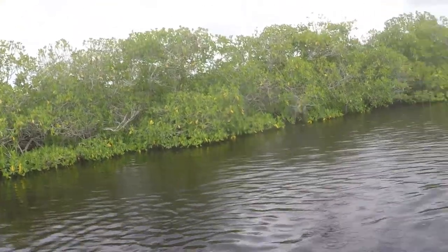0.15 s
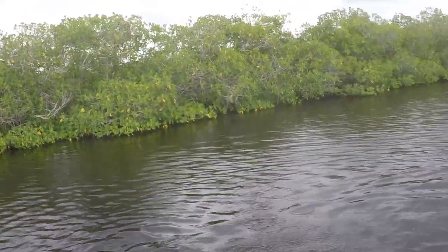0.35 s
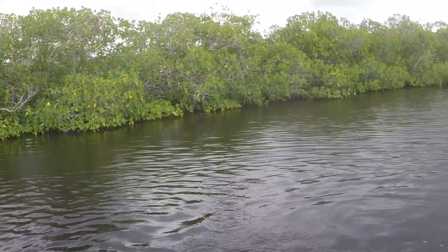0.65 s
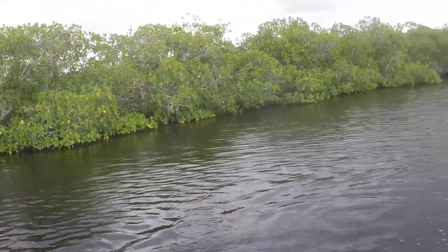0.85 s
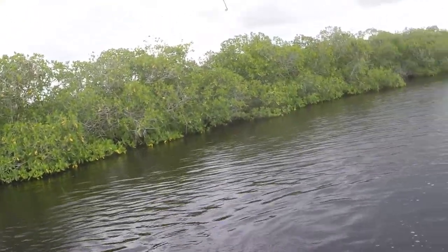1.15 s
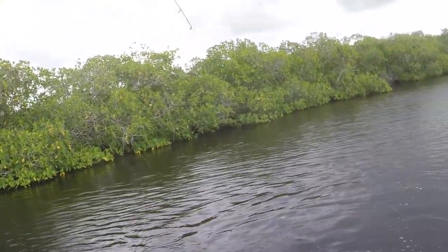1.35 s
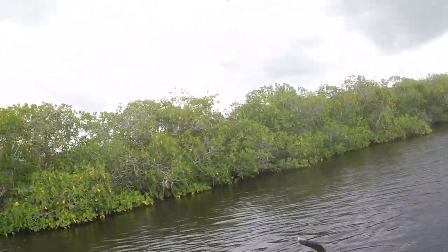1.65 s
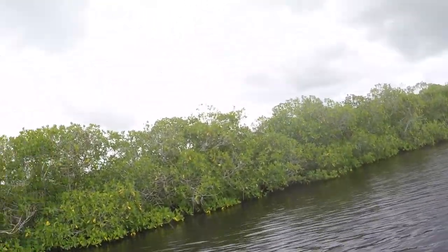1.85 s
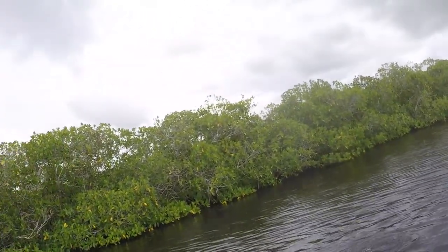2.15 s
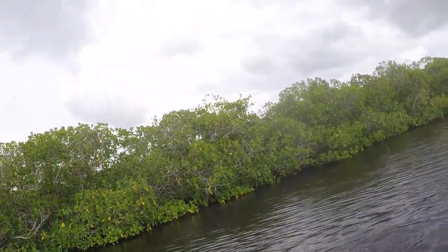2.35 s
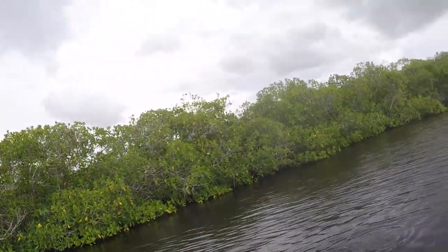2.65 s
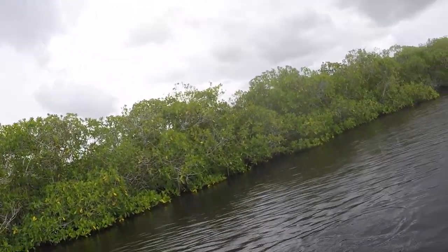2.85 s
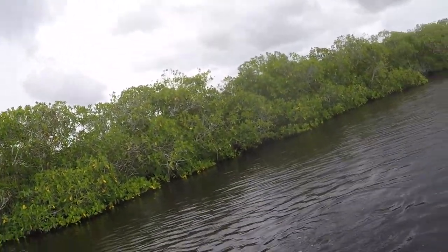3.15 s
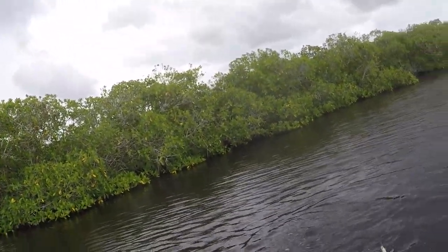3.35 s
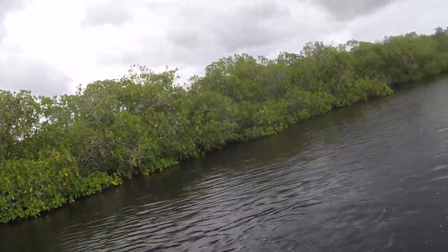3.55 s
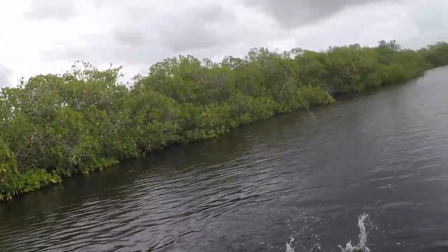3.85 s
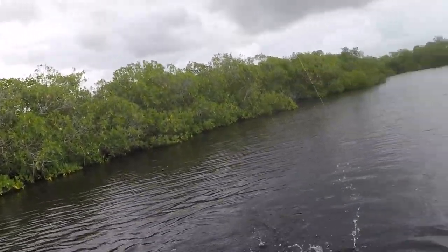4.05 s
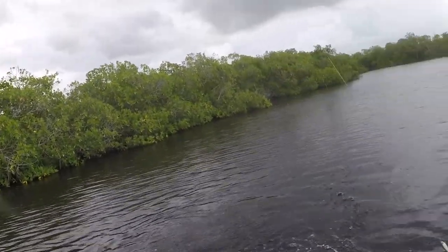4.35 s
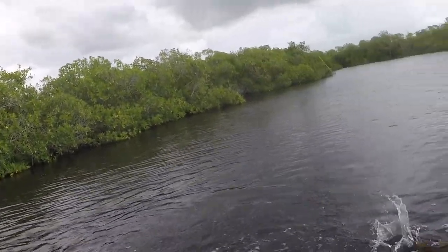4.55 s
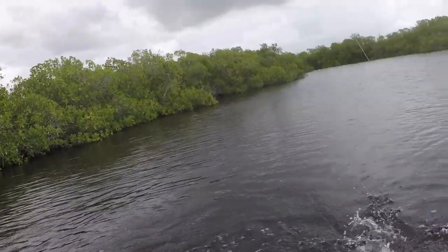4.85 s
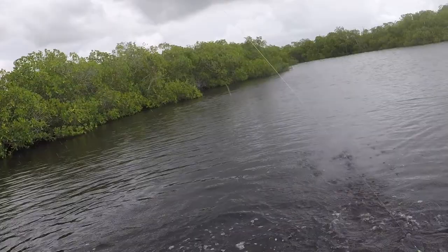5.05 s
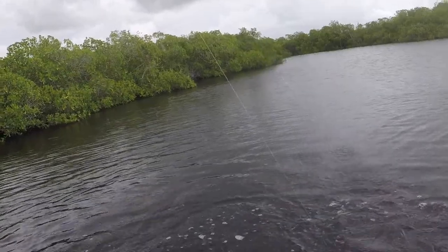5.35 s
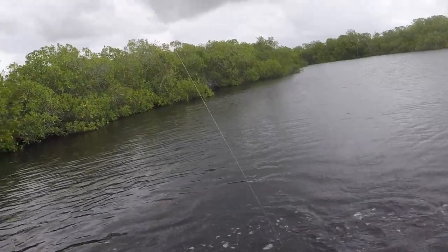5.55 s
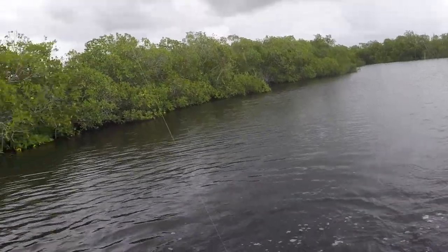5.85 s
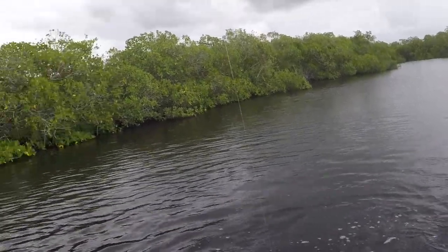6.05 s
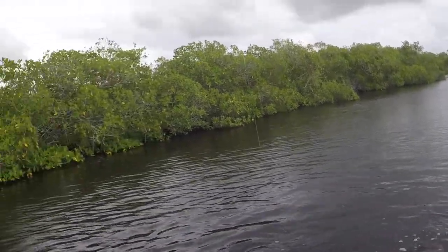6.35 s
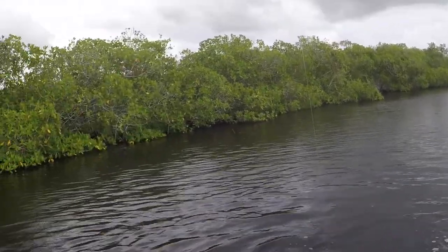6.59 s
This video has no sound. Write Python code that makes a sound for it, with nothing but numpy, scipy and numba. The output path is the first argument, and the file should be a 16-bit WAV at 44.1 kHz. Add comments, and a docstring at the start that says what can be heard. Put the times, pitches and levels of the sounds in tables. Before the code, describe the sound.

Fish thrashing and splashing beside a plastic boat hull, with plops, sharp knocks and ticks, while low wind gusts buffet the microphone increasingly hard.

```python
"""A low wind rumble, fizzing water and a few plops open the scene, then ticks on a hull and hard gusts crowd in.
A fish thrashes beside a plastic kayak on a windy creek, heard by a small two-port camera microphone.
Leaves and wash are coloured noise, wind is band noise with lone swept thuds, fizz is a crowd of decaying sines,
plops and drips are gliding sines, and ticks are ringing hull modes behind a blunt crack."""
import sys
import numpy as np
from scipy import signal
from scipy.fft import rfft, irfft
from scipy.io import wavfile
from scipy.ndimage import uniform_filter1d
from numba import njit

SR = 44100
rng = np.random.default_rng(int(sys.argv[2]) if len(sys.argv) > 2 else 0)


def wav_record(signal):
    """Record a signal, one row per channel, as 16-bit PCM in the file named by sys.argv[1]."""
    frames = np.transpose(np.atleast_2d(signal))
    bounded = np.clip(frames, -1, 1)
    # unit amplitude maps onto the largest positive 16-bit level
    quanta = np.round(bounded * 32767).astype(np.int16)
    wavfile.write(sys.argv[1], SR, quanta)


N = 296352
T = np.arange(N) / SR


def undb(db):
    """Turn decibels into a gain."""
    return 10 ** (np.asarray(db) / 20)


def unit(x):
    """Scale to rms 1."""
    return x / np.sqrt(np.mean(x ** 2))


def noise():
    """White noise as long as the scene."""
    return rng.standard_normal(N)


def colour(x, points):
    """Shape a sound by (Hz, dB) points joined on a log-frequency axis; rms 1."""
    hz, db = np.transpose(points)
    f = np.maximum(np.arange(N // 2 + 1) * SR / N, 1)
    shape_db = np.interp(np.log(f), np.log(hz), db, -90, -90)
    return unit(irfft(rfft(x) * undb(shape_db), N))


def band(x, lo_hz, hi_hz, order=2):
    """Keep one band of a sound; rms 1."""
    return unit(signal.sosfilt(signal.butter(order, [lo_hz, hi_hz], "band", fs=SR, output="sos"), x))


def walk(rate):
    """Random levels held 1 / rate s and slewed; rms 1."""
    hold = int(SR / rate)
    steps = np.repeat(rng.standard_normal(N // hold + 1), hold)
    return unit(uniform_filter1d(steps, hold)[:N])


def ports(x, alike):
    """The ports are wired in opposite sense and the left one hears late; diffuse sound is partly unalike."""
    lag_s = 0.00013
    left = alike * x[0] + np.sqrt(1 - alike ** 2) * x[1]
    return np.array([-np.interp(T - lag_s, T, left), x[0]])


def from_right(x):
    """Sound off the water on the right reaches the left port weak and late."""
    pan_db, lag_s = -8, 0.00059  # left minus right; delay of the left port
    late = np.interp(T - lag_s, T, x)
    return np.array([late, x]) * undb(np.array([[pan_db], [-pan_db]]) / 2)


def add(out, s, x, pan_db):
    """Place a short near sound: the left port in opposite sense, later the further right the source lies."""
    centre_lag_s, lag_per_db_s = 0.000035, -0.000018  # the louder the left port, the sooner it hears
    i, n = int(s * SR), np.arange(x.shape[1])
    lag = (centre_lag_s + lag_per_db_s * pan_db) * SR
    late = np.interp(n - lag, n, x[0], 0)
    placed = np.array([-late, x[1]]) * undb(np.array([[pan_db], [-pan_db]]) / 2)
    out[:, i:i + len(n)] += placed[:, :N - i]


@njit
def grains(rows, sr, n):
    """Decaying sines from rows (sample, Hz, cycles, size, glide); pitch grows by about exp(glide)."""
    y = np.zeros(n)
    for r in rows:
        phase, size, step = 0., r[3], 2 * np.pi * r[1] / sr
        length = int(3 * r[2] * sr / r[1])
        for i in range(int(r[0]), min(n, int(r[0]) + length)):
            y[i] += size * np.sin(phase)
            phase += step
            step *= 1 + r[4] / length
            size *= 1 - 5. / length
    return y


def fizz(rate, lo_hz, hi_hz, cycles, spread_db, glide):
    """Bubbles bursting, rate per second, at random times, pitches and sizes; rms 1."""
    when, pitch, rarity, length = rng.random((4, int(N / SR * rate)))
    hz = lo_hz * (hi_hz / lo_hz) ** pitch
    size = undb(-spread_db * np.log(rarity + .03))  # few large ones among many small
    rows = np.column_stack([when * N, hz, cycles * (.5 + length), size, np.full(len(when), glide)])
    return unit(grains(rows, 1. * SR, N))


def leaves():
    """Smooth distant hiss of foliage and ripples: coloured noise whose level drifts slowly."""
    # Tint of the foliage. Each row: frequency in Hz, relative density in dB per Hz.
    leaf_tint = [(150, -46), (250, 4.5), (872, -8.5), (1210, -12.5), (1900, -20), (2890, -25.5),
                 (4780, -42), (5880, -28), (9400, -23), (12600, -35.5), (15800, -38)]
    level_db = -47.5 + 1.0 * walk(3.0)
    return undb(level_db) * ports([colour(noise(), leaf_tint) for _ in range(2)], 0.87)


def puffs(eddies):
    """A lone eddy thuds for a few cycles, often harder on one port and out of step between them,
    and sheds small eddies."""
    # Single hard puffs. Each row: start in seconds, thud level in dB, nominal pitch in Hz,
    # small-eddy level in dB, left minus right in dB.
    puff_rows = [(0.76, -21, 150, -42, -6), (0.942, -24.5, 158, -37.5, -6), (1.056, -28, 136, -40.5, 3),
                 (1.386, -23.5, 186, -34.5, -13), (1.427, -26, 120, -38, -31),
                 (1.499, -16.5, 190, -30.5, -4), (1.544, -16.5, 183, -48, 4), (1.58, -17, 103, -26.5, -11),
                 (1.63, -17.5, 159, -25, -9.5), (1.708, -23, 88.8, -43, -2), (1.79, -22.5, 88, -36, -10),
                 (1.845, -20.5, 110, -39, -1), (1.911, -21.5, 91.5, -36, -13), (2.329, -18, 111, -26, 4),
                 (2.482, -22, 71, -29, 10), (2.565, -25, 120, -36, 27), (2.613, -17.5, 151, -50, 15),
                 (2.695, -19, 96, -36, -3), (2.806, -17, 116, -23.5, 12.5), (3.034, -13, 97, -29.5, 10),
                 (3.168, -18.5, 116, -32.5, 9.5), (3.267, -12, 94, -25.5, 7), (3.307, -18, 75, -26, 30),
                 (3.391, -27, 75.4, -49, 24), (3.444, -23, 135, -33, 8), (3.507, -18, 99, -41, 14),
                 (3.566, -18.5, 109, -38, 3.5), (3.757, -18.5, 126, -55, 7), (3.788, -20.5, 75, -63, 14),
                 (4.046, -17.5, 99, -44, -5.5), (4.268, -26, 118, -37, 17), (4.406, -22, 120, -30.5, 13),
                 (4.448, -17.5, 93, -64, 10), (4.704, -19.5, 94, -39, -9), (4.997, -16, 80.7, -36, 0),
                 (5.045, -16, 74.6, -30, -2), (5.084, -16.5, 85, -18.5, -8.5),
                 (5.148, -14.5, 197, -28, -13), (5.191, -10.5, 189, -27, 7), (5.229, -24, 176, -27.5, 5),
                 (5.379, -17, 208, -48, -21), (5.41, -22, 94.2, -20.5, 11), (5.523, -14.5, 78, -37, 13),
                 (5.609, -20, 94, -33, -7), (5.64, -13, 111, -60, 3.5), (5.703, -14, 172, -28, -16.5),
                 (5.759, -20.5, 108, -33, 6), (5.81, -14, 156, -32, -1), (5.862, -13, 107, -23, -4),
                 (5.941, -18, 110, -46, -17), (6.049, -17, 99.7, -45, -17), (6.351, -23.5, 93.5, -59, 11),
                 (6.653, -21, 79.4, -32.5, -8), (6.699, -18.5, 106, -47, 10)]
    cycles, swell_power, eddy_peak_s = 3.18, 0.54, 0.0097
    out = np.zeros((2, N))
    phases = 2 * np.pi * rng.random((len(puff_rows), 2, 1))
    for (at, db, hz, eddy_db, pan_db), phase in zip(puff_rows, phases):
        share = 2 / (1 + undb([[-pan_db], [pan_db]]))
        i = int(at * SR)
        x = np.arange(int(cycles * SR / hz)) * hz / SR / cycles  # 0 to 1 through the thud
        sweep = 2 * np.pi * cycles * x * (1.15 - 0.17 * x)  # the pitch sags
        thud = np.sin(sweep + phase) * np.sin(np.pi * x ** swell_power) ** 2
        out[:, i:i + len(x)] += (undb(db) * share * thud)[:, :N - i]
        age = np.maximum(T[i:i + 4096] - at, 0) / eddy_peak_s
        out[:, i:i + 4096] += undb(eddy_db) * share * age * np.exp(1 - age) * eddies[:, i:i + 4096]
    return out


def wind():
    """Eddies press on each port: a rumble, and quick lumpy buffets; the smallest eddies shake both at once."""
    # Gusts on the ports. Each row: time in seconds, buffet level in dB, rumble level in dB,
    # left minus right in dB.
    gusts = [(0, -47, -33, -1), (0.35, -48, -40, -1), (0.63, -48, -40, -3), (0.76, -39, -33, -7),
             (1.1, -32, -30.5, -6.5), (1.25, -50, -31.5, 8), (1.38, -36.5, -33, 4),
             (1.47, -30, -28.5, -8.5), (1.66, -24.5, -34.5, 3), (1.9, -37.5, -29, -18.5),
             (2.06, -32, -33, 1), (2.41, -38, -31, 0.5), (2.55, -33, -26.5, 4), (2.93, -35.5, -32, 2.5),
             (3.3, -32, -27.5, 6), (3.52, -30, -27.5, 9.5), (3.7, -38, -29.5, 7), (4.08, -31, -26, 6),
             (4.5, -33.5, -29.5, -1), (4.63, -36, -27.5, -5.5), (4.74, -31.5, -31.5, -12.5),
             (4.92, -35, -31.5, 3.5), (5.02, -22.5, -36, -6), (5.181, -17, -29, -0.5),
             (5.3, -30, -30, 16.5), (5.43, -22.5, -30, 3), (5.62, -31, -35, 9.5),
             (5.861, -25.5, -25.5, -17), (5.98, -37.5, -37, -9), (6.05, -34, -32, -22),
             (6.15, -53.5, -34.5, -13), (6.4, -35.5, -37, 13.5), (6.551, -46, -29, -3),
             (6.72, -28, -29.5, 8)]
    s, *cols = np.transpose(gusts)
    buffet_db, rumble_db, pan_db = (np.interp(T, s, c) for c in cols)
    # small eddies against large ones: they grow faster than the gust
    bright_db = -7 + 0.7 * (buffet_db + 23.5) + 0.33 * walk(17)
    shared_lumps = np.tanh(walk(70))  # tanh bounds the lumps
    shared = band(noise() * undb(20.2 * shared_lumps), 270, 495)
    push = band(noise() * undb(4 * shared_lumps), 138, 263)
    heave_db = 1.5 * walk(9.2)
    out, eddies = [], []
    for sign in (1, -1):  # left, right: opposite wiring flips the shared part
        lumps = np.tanh(walk(45)) + 0.96 * shared_lumps
        rumble = band(noise(), 13.6, 60.5, order=4) * undb(rumble_db + heave_db)
        low = band(noise() * undb(2.5 * lumps), 56.3, 190.0, order=3) + sign * 0.5 * push
        high = band(noise() * undb(3.2 * lumps), 159.0, 351, order=3) * undb(-2.0)
        high = high + sign * 0.46 * shared
        lean_db = sign * pan_db / 2
        gust_db = buffet_db + lean_db + walk(15)
        buffet = undb(gust_db) * (low + undb(bright_db) * high)
        out.append(undb(0.26 * lean_db) * rumble + buffet)  # the rumble leans less
        eddies.append(high)
    return np.array(out) + puffs(np.array(eddies))


def flutter():
    """Finest wind flutter, loud in the hardest gusts: lumpy ripples mostly opposite in sense at the two ports."""
    # Flutter on the ports. Each row: time in seconds, level in dB.
    flutter_levels = [(0.6, -62), (1.0, -61), (1.3, -83), (1.6, -47), (1.9, -61), (3.3, -59), (4.9, -77),
                      (5.03, -44.5), (5.17, -26.5), (5.32, -47), (5.44, -38.5), (5.62, -68), (5.83, -37.5),
                      (5.93, -43), (5.99, -73), (6.04, -49), (6.15, -78)]
    alike = 0.8
    lumps = undb(2.5 * np.tanh(walk(60)))
    both, left, right = (band(noise() * lumps, lo_hz=405, hi_hz=630) for _ in range(3))
    pair = alike * np.array([both, -both]) + np.sqrt(1 - alike ** 2) * np.array([left, right])
    return pair * undb(np.interp(T, *np.transpose(flutter_levels)))


def churn():
    """Wash: hiss with gurgling bubbles. Spray: fine crackle. Spurts swell both for a moment."""
    # Churned water. Each row: time in seconds, wash drive in dB, spray drive in dB.
    churn_levels = [(0.0, -44.5, -48), (0.28, -52.5, -58.5), (0.73, -59.5, -62.5), (0.95, -56.5, -59.5),
                    (1.29, -58, -49), (1.65, -51.5, -62.5), (1.95, -43.5, -56), (2.11, -42, -52.5),
                    (2.26, -40.5, -54), (2.5, -46.5, -59.5), (3.09, -60.5, -64.5), (3.35, -51.5, -54),
                    (3.7, -49, -63.5), (4.1, -38, -46.5), (4.3, -43.5, -47.5), (4.5, -48.5, -51.5),
                    (4.7, -39.5, -48.5), (5.02, -43, -49.5), (5.4, -61, -59.5), (5.73, -50, -57),
                    (6.1, -66, -63.5), (6.33, -54, -61), (6.48, -68, -51.5), (6.6, -54, -62),
                    (6.72, -47, -58)]
    # Spurts of spray. Each row: start in seconds, spray drive in dB, wash drive in dB, length in seconds.
    spurts = [(0.092, -41, -80, 0.0053), (1.391, -35, -20, 0.0091), (1.669, -43, -41.5, 0.028),
              (1.942, -40.5, -77, 0.021), (2.287, -60, -33, 0.036), (2.323, -36.5, -35, 0.014),
              (3.247, -44, -54, 0.014), (3.287, -49, -34, 0.042), (3.445, -50, -35, 0.049),
              (3.603, -40, -45, 0.033), (3.708, -41, -37.5, 0.044), (3.77, -47.5, -72, 0.075),
              (3.849, -32, -33, 0.0093), (3.928, -48, -63, 0.042), (4.144, -33, -56, 0.032),
              (4.379, -40, -32, 0.062), (4.493, -41.5, -43.5, 0.057), (4.624, -44.5, -43, 0.055),
              (4.798, -47, -56, 0.034), (4.837, -30.5, -70, 0.0064), (5.127, -69, -33, 0.0089)]
    # Tints of the two hisses. Each row: frequency in Hz, relative density in dB per Hz.
    wash_tint = [(240, -34), (400, 21.5), (484, 7), (585, -15), (1440, -9), (2410, 8), (3240, -1),
                 (5000, -33), (6500, -33), (11000, -120)]
    spray_tint = [(2240, 3.5), (3800, -10), (4710, -5), (7460, 0), (9640, -7.5), (14000, -25.5),
                  (15100, -23), (15800, -48)]
    s, wash_db, spray_db = np.transpose(churn_levels)
    wash_gain, spray_gain = undb(np.interp(T, s, wash_db)), undb(np.interp(T, s, spray_db))
    for at, spurt_spray_db, spurt_wash_db, length in spurts:
        x = np.clip((T - at) / length, 0, 30)
        swell = (1 - np.exp(-2.5 * x)) * np.exp(-x ** 2)
        spray_gain += undb(spurt_spray_db) * swell
        wash_gain += undb(spurt_wash_db) * swell
    patchy = walk(30)
    gurgle = fizz(320, 487.4, 2092, cycles=13.0, spread_db=1.6, glide=0.32)
    wash, spray = [], []
    for _ in range(2):
        hiss = colour(noise() * undb(2.0 * walk(90)), wash_tint)
        bubbles = fizz(700, 880, 3570, cycles=3.9, spread_db=6.1, glide=0.2)
        wash.append(0.27 * hiss + 0.52 * bubbles + 0.23 * gurgle)
        crackle = colour(noise() * undb(3.4 * walk(500)), spray_tint)
        droplets = fizz(400, 3285, 10100, cycles=11.0, spread_db=4.5, glide=0.3)
        spray.append(crackle + 0.43 * droplets)
    right_gurgle = from_right(fizz(200, 544.0, 2408, cycles=9.4, spread_db=2.9, glide=0.29))
    wash_pair = (ports(wash, 0.77) + 0.39 * right_gurgle) * wash_gain * undb(3.04 * patchy)
    spray_lean_db = np.array([[-1.5], [1.5]])
    spray_pair = ports(spray, 0.28) * spray_gain * undb(0.87 * patchy + spray_lean_db)
    return wash_pair + spray_pair


def casing(water):
    """Resonances round the ports lift or hollow out parts of the water's spectrum."""
    # Casing resonances. Each row: centre in Hz, width in Hz, boost or cut in dB.
    resonances = [(1543, 170, 3), (2440, 530, -7.5), (3210, 350, 5), (8300, 5400, 2.5)]
    for hz, width, db in resonances:
        peak = signal.lfilter(*signal.iirpeak(hz, hz / width, fs=SR), water)
        water = water + (undb(db) - 1) * peak
    return water


def drips():
    """Single drops: a short decaying pip each, gliding slightly up."""
    # Small drips. Each row: start in seconds, starting pitch in Hz, level in dB before panning.
    drip_rows = [(.209, 1410, -40), (.273, 1430, -42), (.299, 3300, -42), (.677, 1300, -42),
                 (.758, 2970, -37), (1.843, 3130, -36), (2.157, 3430, -37), (2.187, 3150, -36),
                 (2.604, 2800, -34), (2.725, 3300, -45), (3.15, 2390, -38), (3.379, 3170, -32),
                 (5.423, 1500, -40), (5.464, 3300, -33.5), (5.655, 1920, -36), (5.716, 3200, -37),
                 (5.772, 3440, -30), (5.824, 3000, -43)]
    cycles, glide = 6.9, .08
    s, hz, db = np.transpose(drip_rows)
    one = np.ones(len(s))
    rows = np.column_stack([s * SR, hz, cycles * one, undb(db), glide * one])
    return from_right(grains(rows, 1. * SR, N))


def plops():
    """Bubbles and drops, from low plops to short high pips: most rise in pitch, and their level wobbles."""
    # Plops. Each row: start in seconds, start pitch in Hz, end pitch in Hz,
    # level in dB before wobble and panning, length in seconds.
    plop_rows = [(.004, 1450, 1550, -42, 0.029), (.016, 344, 570, -33.5, 0.031),
                 (0.03, 620, 1010, -31, 0.034), (.131, 1080, 1280, -36.5, 0.013),
                 (0.423, 716, 600, -21, 0.0062), (.432, 686, 530, -34, 0.025),
                 (1.422, 3330, 3380, -32.5, 0.0074), (1.859, 448, 1500, -38, 0.045),
                 (1.973, 488, 298, -39.5, 0.021), (1.994, 690, 850, -40, 0.044),
                 (2.006, 1340, 1500, -42, 0.01), (2.047, 542, 803, -40, 0.069),
                 (2.09, 804, 627, -35, 0.027), (2.155, 1000, 1150, -39, 0.016),
                 (2.248, 1310, 1590, -47, 0.021), (2.275, 3130, 3050, -46, 0.011),
                 (2.427, 1450, 1600, -46, .012), (2.461, 384, 503, -18, 0.01),
                 (2.47, 930, 1110, -21, 0.0074), (2.473, 380, 257, -28, 0.016),
                 (2.511, 1680, 1770, -48, 0.019), (2.552, 726, 790, -33.5, 0.013),
                 (2.563, 1510, 1560, -39.5, 0.0098), (2.61, 654, 910, -39, 0.0099),
                 (2.664, 650, 1010, -41, 0.0098), (3.306, 660, 750, -24, 0.01),
                 (3.413, 1570, 1700, -41, 0.0046), (3.437, 1150, 1050, -43, .011),
                 (3.44, 566, 805, -36, 0.029), (3.46, 1440, 1600, -40, .01), (3.534, 1260, 1700, -47, .018),
                 (3.718, 1500, 1750, -41, 0.017), (3.962, 595, 900, -26.5, 0.021),
                 (3.971, 1670, 1910, -31, 0.0091), (4.006, 800, 950, -44, .0078),
                 (4.036, 580, 694, -28.5, 0.011), (4.08, 1370, 1520, -33, .012),
                 (4.271, 775, 900, -42, 0.016), (4.294, 680, 1030, -30, 0.021),
                 (4.405, 755, 875, -28.5, 0.02), (4.414, 2020, 2220, -31.5, 0.0076),
                 (4.52, 985, 1140, -36, 0.016), (4.627, 1620, 1750, -40, 0.0078),
                 (4.658, 1400, 1560, -34, 0.012), (4.707, 553, 630, -38.5, 0.054),
                 (4.779, 710, 810, -31, 0.013), (5.64, 504, 847, -39, 0.062), (5.675, 760, 1450, -38, 0.02),
                 (5.802, 577, 680, -45, .018), (6.669, 380, 790, -27, 0.016), (6.681, 800, 990, -32, 0.015),
                 (6.694, 1020, 910, -25.5, .021)]
    dry_plops = np.zeros(N)
    for at, start_hz, end_hz, db, length in plop_rows:
        x = np.arange(int(length * SR)) / (length * SR)
        i = int(at * SR)
        hz = start_hz + (end_hz - start_hz) * x
        swell = np.sin(np.pi * x ** 0.39)  # quick rise, slow fall
        dry_plops[i:i + len(x)] += undb(db) * np.sin(2 * np.pi * np.cumsum(hz) / SR) * swell
    wobble_db = 5.2 * np.tanh(walk(150))
    return from_right(dry_plops * undb(wobble_db))


def ticks():
    """Drops and gear on the hull: each blow rings modes around its brightest pitch, with a blunt crack
    and a short hissy edge."""
    # Ticks. Each row: start in seconds, peak level in dB before edge and panning, brightest pitch in Hz,
    # edge level in dB against the body, left minus right in dB, ring (60 dB fall) in seconds,
    # fall above the brightest pitch in dB per octave.
    tick_rows = [(0.411, -28, 1204, -17, 3.5, 0.028, 8), (0.424, -15.5, 1030, -14, -4, 0.024, 6.5),
                 (0.5, -16.5, 1060, -39, 0, 0.022, 24), (0.617, -24.5, 1090, -29, 5, 0.018, 4),
                 (0.717, -29, 1540, -20, -2.5, 0.023, 26), (0.913, -26, 1530, -17, 4, 0.011, 4),
                 (0.974, -26, 1070, -14, 0, 0.019, 28), (1.342, -12.5, 2450, -26, -3, 0.0055, 12),
                 (1.394, -17.5, 950, -2, -6.5, 0.0078, -3), (1.62, -29.5, 780, -11, 8, 0.021, 1),
                 (1.658, -12, 725, -24, 0.5, 0.023, 9.5), (1.913, -23, 1610, -17, -3, 0.013, 4),
                 (1.975, -25.5, 1180, -14, -2.5, 0.013, -1), (2.149, -21, 483, -35, 1, 0.049, 6),
                 (2.235, -3, 2890, -43, 4, 0.0096, 43), (2.461, -13.5, 1680, -18, -5, 0.019, 6),
                 (2.658, -18, 1250, -16.5, -4, 0.013, 8.5), (2.979, -33.5, 2310, -23, -6.5, 0.01, 37),
                 (3.014, -27.5, 2760, -19, 4.5, 0.007, 9), (3.06, -35, 2380, -17, 4.5, 0.014, 27),
                 (3.246, -22, 3110, -3, -0.5, 0.0086, 23), (3.281, -22, 760, -18, -2, 0.036, 0),
                 (3.463, -23.5, 3270, -8, -4, 0.017, 13), (3.498, -16, 1270, -31, -1, 0.022, 9),
                 (3.699, -24.5, 1650, -23, -3.5, 0.017, 9), (3.739, -21, 1370, -21, -6.5, 0.036, 11),
                 (3.795, -28.5, 4250, -4, -3, 0.016, 8), (3.833, -32.5, 1930, -9, -3.5, 0.056, 16),
                 (3.844, -31, 3030, -6, -4, 0.062, -2), (3.925, -27.5, 2340, -6, -5, .011, -14),
                 (3.962, -19, 805, -28, -6.5, 0.027, 12), (3.975, -21.5, 1760, -20, -4, 0.023, 8),
                 (4.021, -26.5, 1486, -20, -2, 0.027, 13), (4.074, -24.5, 1360, -24, -5.5, 0.027, -6),
                 (4.11, -28.5, 1610, -25, -20, 0.018, 23), (4.155, -27, 3170, -1, -1.5, 0.013, 5),
                 (4.166, -15.5, 1350, -13, -4, 0.025, 6.5), (4.23, -28.5, 2920, -9, -2, 0.022, -13),
                 (4.274, -30, 850, -14, -13.5, 0.049, 25), (4.326, -28, 2620, -22, -2, 0.015, 20),
                 (4.408, -28, 764, 0, -1, 0.019, 17), (4.433, -31, 1200, -7, -8, 0.022, 9),
                 (4.627, -23, 1750, -4, 0.5, 0.018, 8), (4.66, -25, 1380, -9, -5, 0.043, 7),
                 (5.11, -20.5, 894, -11, -4.5, 0.013, 3), (5.149, -27, 705, -16, -3, 0.029, 33),
                 (5.341, -19, 1250, -18, -3, 0.012, 4), (5.37, -29.5, 3200, -1, 8, 0.012, -24),
                 (5.498, -20, 1340, -22, -3, 0.012, 7), (5.524, -30.5, 3400, -10, -2.5, 0.0078, -1),
                 (5.655, -29, 756, -8, -5, 0.064, 6), (5.782, -17, 1250, -31, -5, 0.0087, 4),
                 (5.884, -36, 2220, -14, 6.5, 0.0089, 11), (5.919, -24, 910, -22, 3, 0.016, 22),
                 (5.944, -18.5, 1260, -25, -3, 0.023, 12.5), (6.03, -27, 750, -26, 3, 0.026, 0),
                 (6.045, -30.5, 1485, -22, -1.5, 0.015, 7), (6.319, -24, 970, -20, 0, 0.028, 3.5),
                 (6.449, -25.5, 1175, -9, 0, 0.033, 6), (6.623, -24.5, 1310, -14, -1.5, 0.021, 5),
                 (6.665, -5, 1940, -43, 5.5, 0.0085, 0), (6.697, -16, 1250, -32, -4, 0.017, 38)]
    # Hull modes. Each row: nominal pitch in Hz, relative level in dB.
    hull_modes = [(430, 2.5), (640, 6.5), (830, 4), (1050, -4.5), (1350, 5), (1650, 4.5), (1950, 2.5),
                  (2350, 4), (2900, 7.5), (3300, 5.5), (4000, 2), (5900, -9)]
    below_db_oct, top_mode_db = 3, 8.5  # fall below the brightest mode; level of that mode
    crack_db, crack_cycles = -4, 0.5
    out, t = np.zeros((2, N)), np.arange(2048) / SR
    hz, db = np.transpose(hull_modes)
    for at, peak_db, top_hz, edge_db, pan_db, ring, above_db in tick_rows:
        level_chance, pitch_chance, phase_chance, port_chance = rng.standard_normal((4, len(hz)))
        f = hz * (1 + 0.025 * pitch_chance)
        top = np.argmin(np.abs(np.log(hz / top_hz)))  # nearest mode takes the brightest pitch
        f[top], phase_chance[top], port_chance[top] = top_hz, 0, 0
        octaves = np.log2(f / top_hz)
        slope = np.where(octaves < 0, below_db_oct, -above_db)
        gain = undb(db + slope * octaves + 1.7 * level_chance)
        gain[top] = undb(top_mode_db)
        decay = np.log(1000) / ring * np.maximum(f / top_hz, 1) ** 0.35  # higher modes die sooner
        # each mode but the brightest gets a small random phase difference between the ports
        phase = 0.53 * phase_chance + 0.29 * np.outer([1, -1], port_chance)
        modes = np.sin(2 * np.pi * np.outer(f, t) + phase[:, :, None]) * np.exp(-np.outer(decay, t))
        body = (gain @ modes) * (1 - np.exp(-t / 0.00067))  # soft onset
        cycle = top_hz * t / crack_cycles
        crack = cycle * np.exp(1 - cycle) * np.sin(2 * np.pi * top_hz * t)
        body = body / np.abs(body).max() + undb(crack_db) * crack
        body /= np.abs(body).max()
        edge_band = signal.butter(2, [4500, 9500], "band", fs=SR, output="sos")
        edge = signal.sosfilt(edge_band, rng.standard_normal(len(t)) * np.exp(-t / 0.0019))
        add(out, at, undb(peak_db) * (body + undb(edge_db) * edge), pan_db)
    return out


def scene():
    """Leaves and wind behind churned water, with drips, plops and hull ticks close by."""
    air = leaves() + wind() + flutter()
    near = drips() + plops() + ticks()
    return air + casing(churn()) + near


def record(dry):
    """The recorder rounds the loudest peaks and cuts the top."""
    rounded = np.tanh(.6 * dry) / .6
    return signal.sosfilt(signal.ellip(10, .2, 80, 15800, fs=SR, output="sos"), rounded)  # low-pass, Hz


dry = scene()
out = record(dry)
wav_record(out)
```